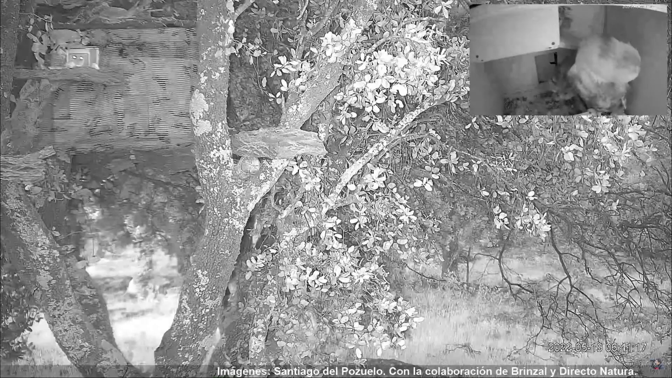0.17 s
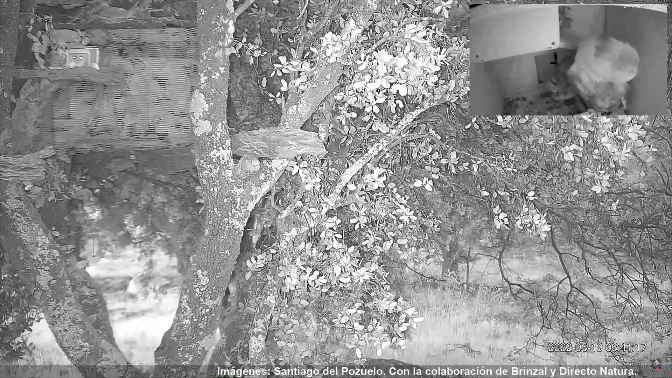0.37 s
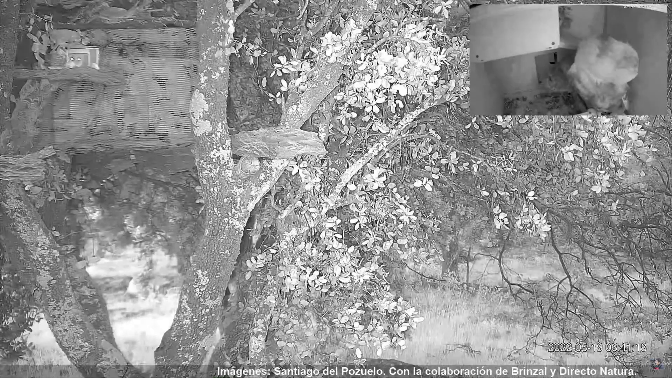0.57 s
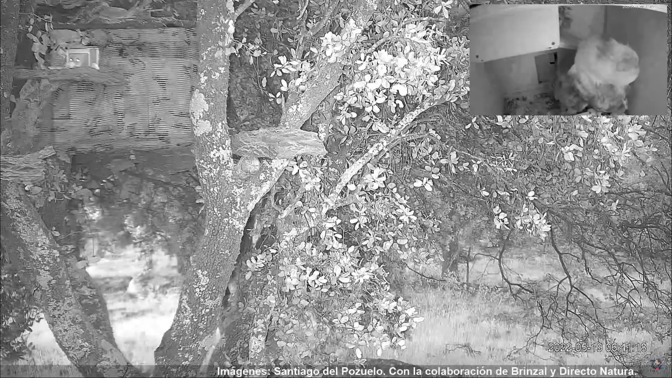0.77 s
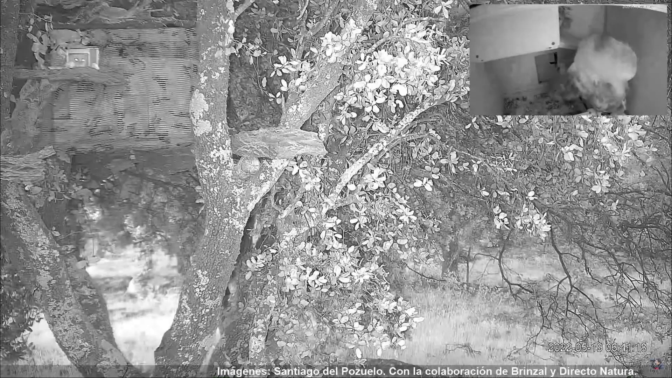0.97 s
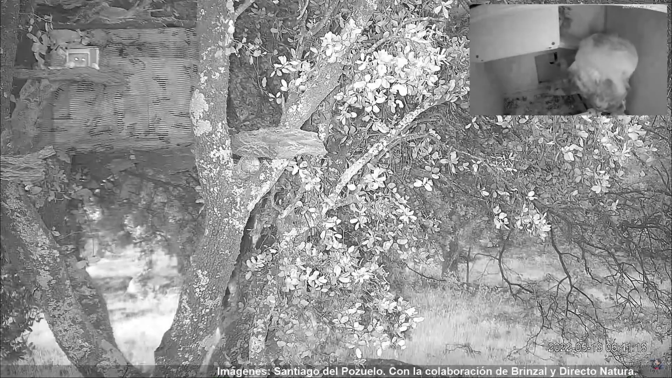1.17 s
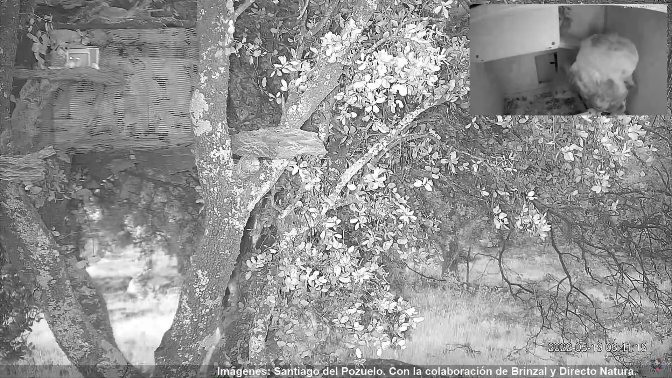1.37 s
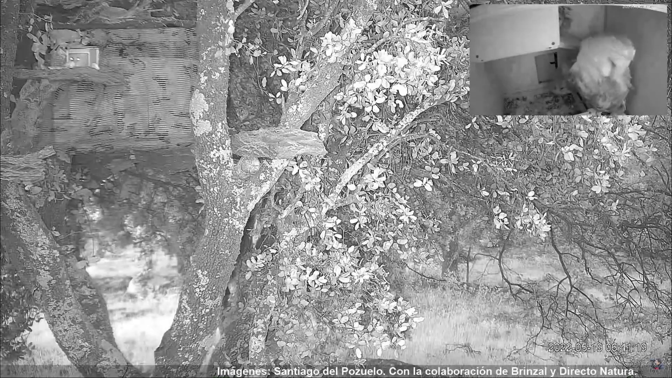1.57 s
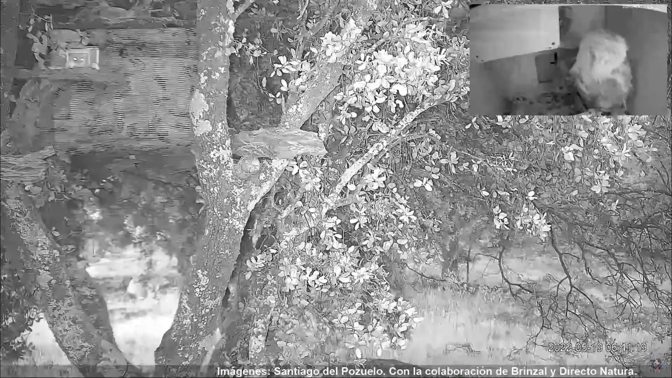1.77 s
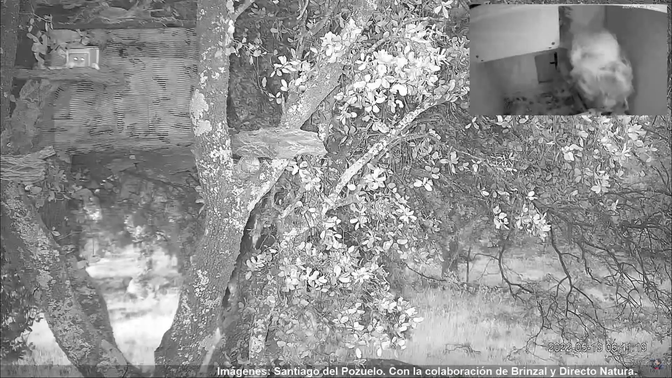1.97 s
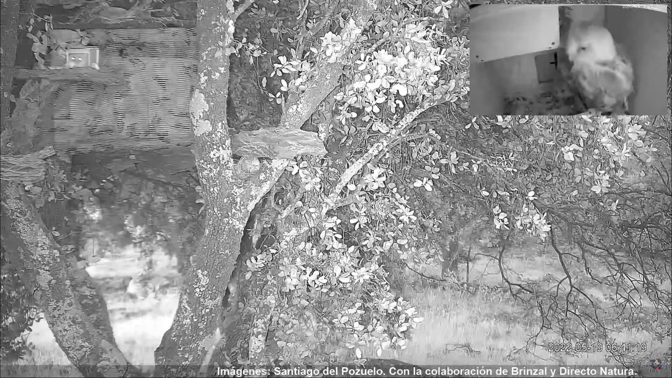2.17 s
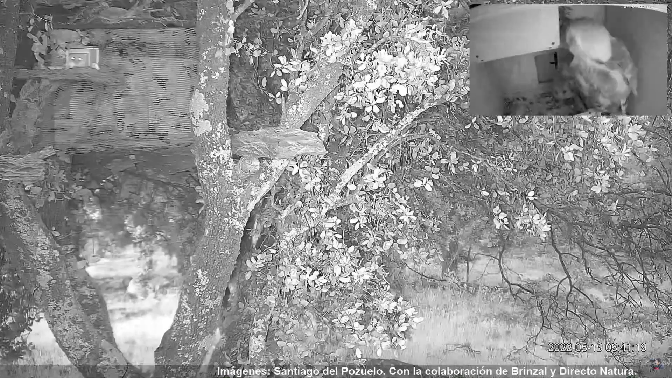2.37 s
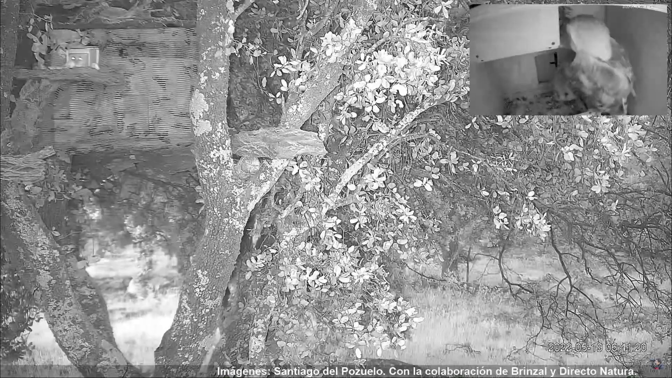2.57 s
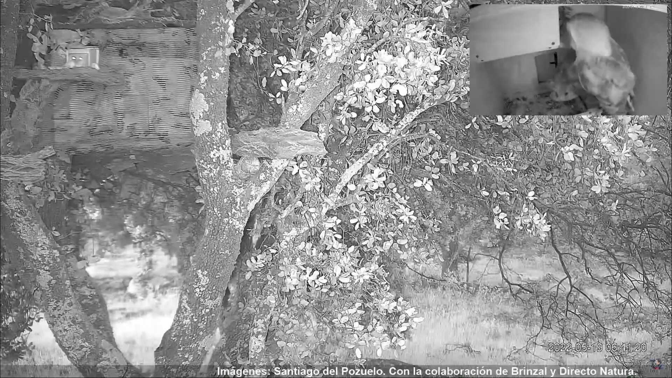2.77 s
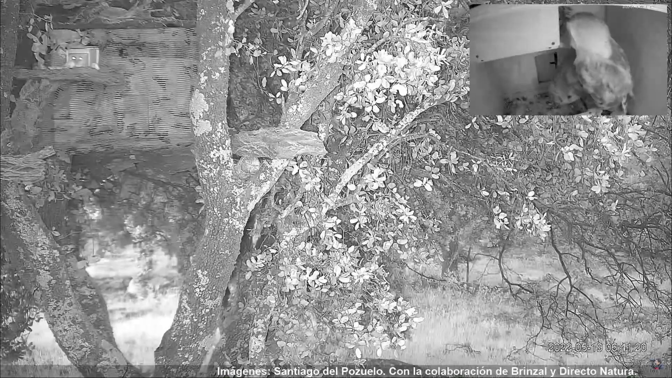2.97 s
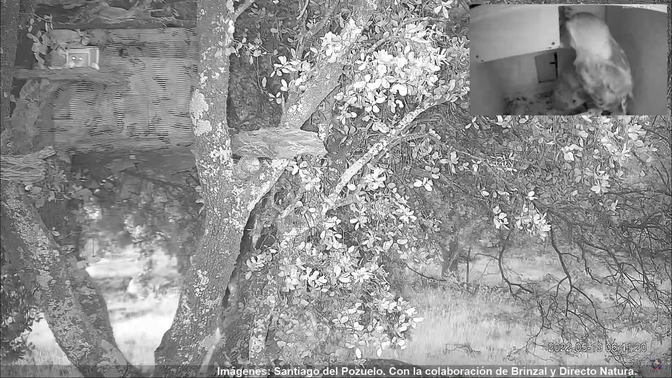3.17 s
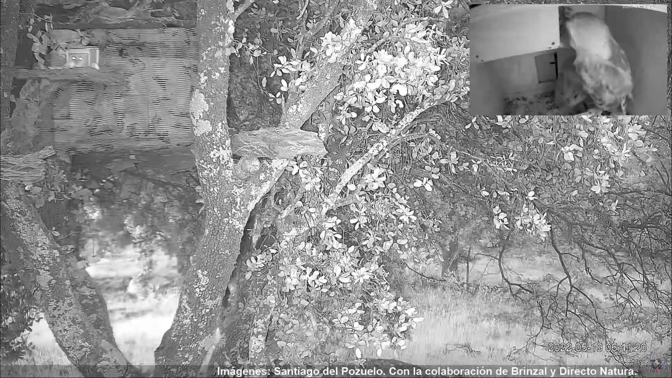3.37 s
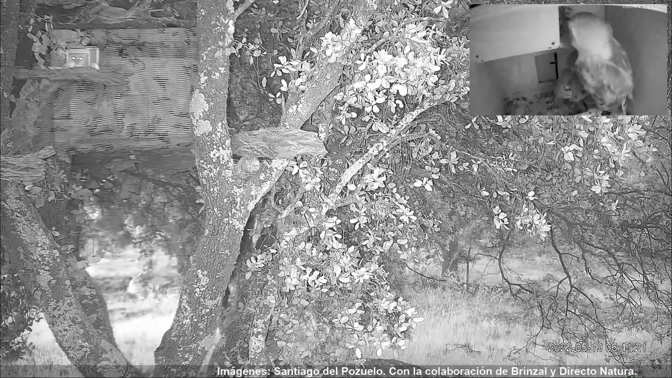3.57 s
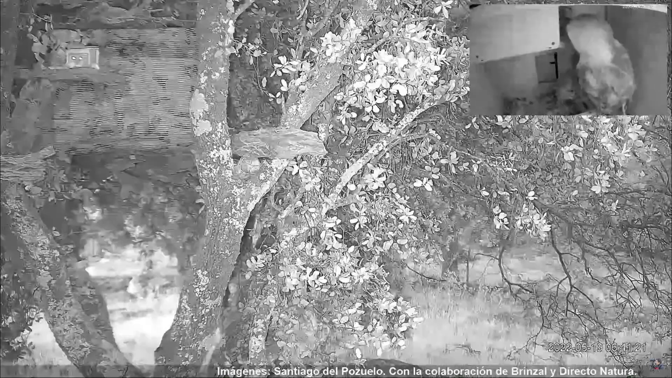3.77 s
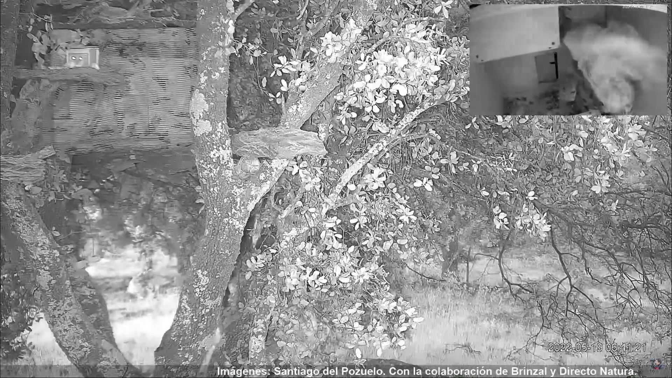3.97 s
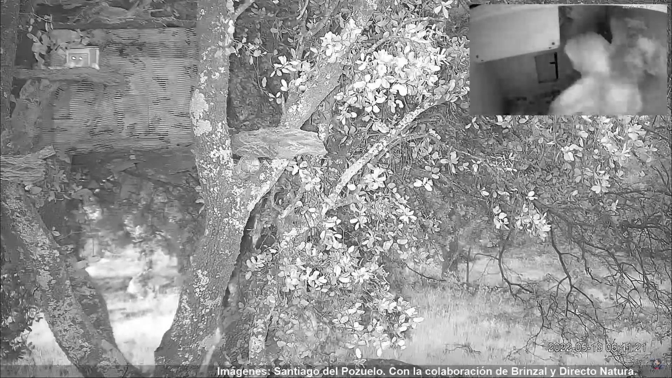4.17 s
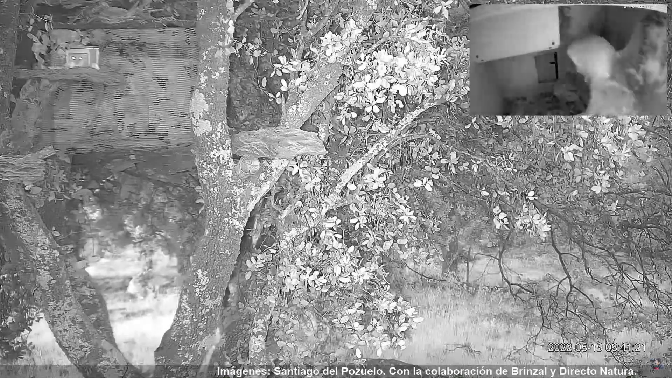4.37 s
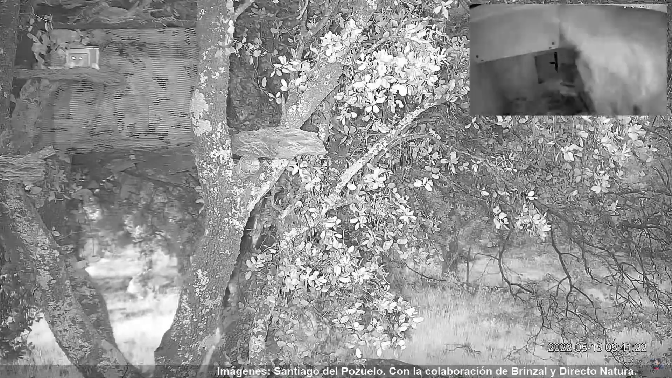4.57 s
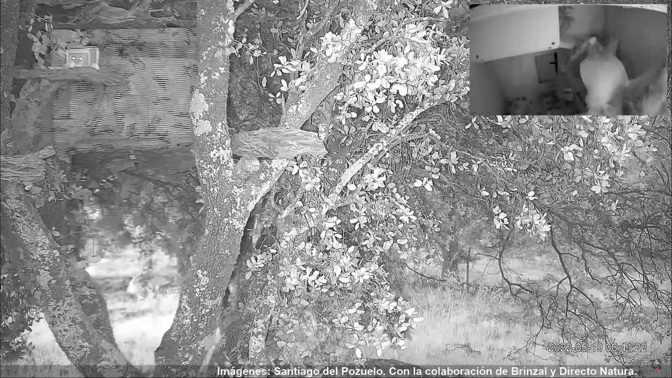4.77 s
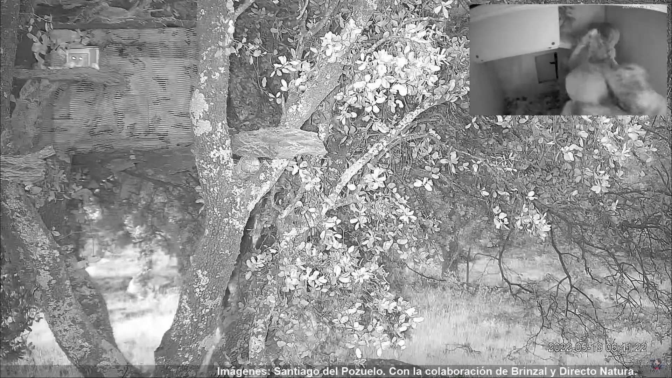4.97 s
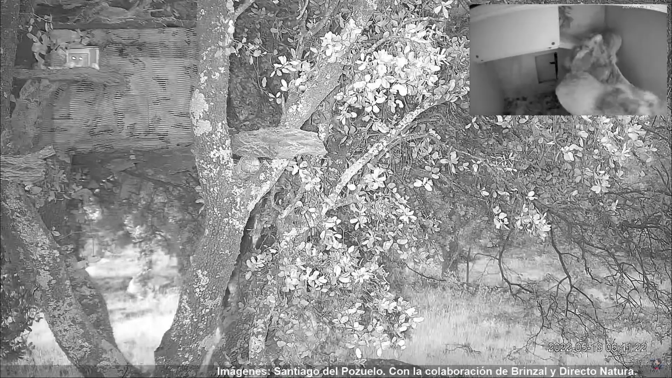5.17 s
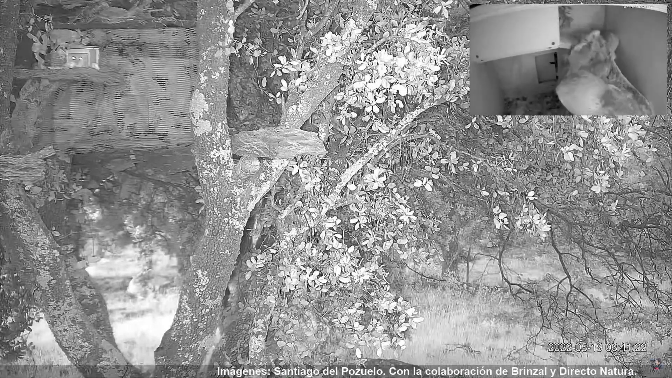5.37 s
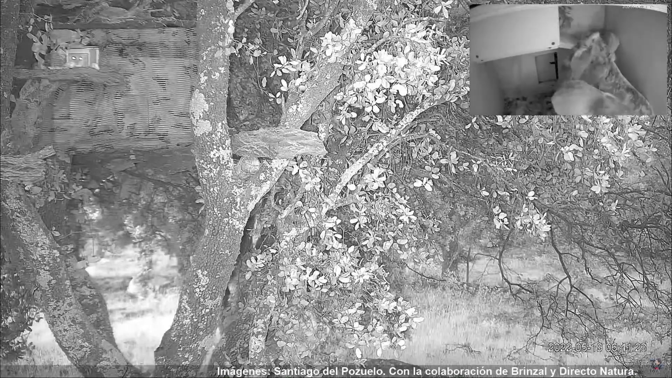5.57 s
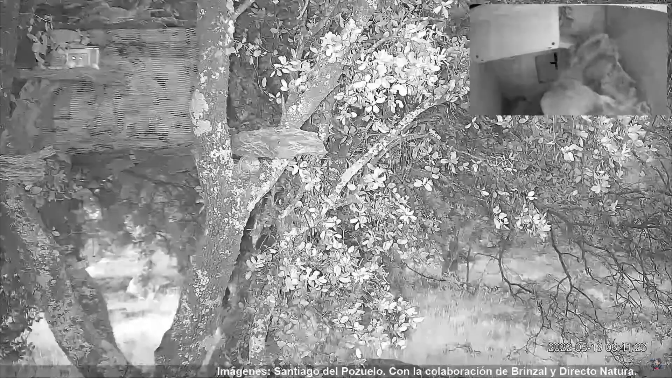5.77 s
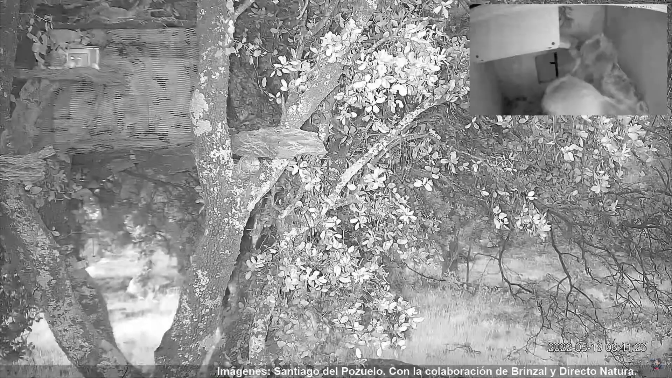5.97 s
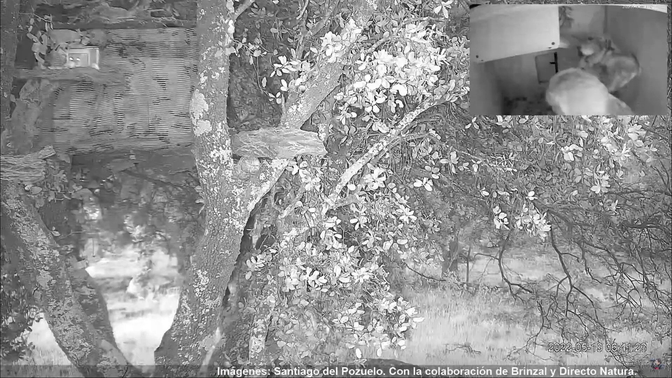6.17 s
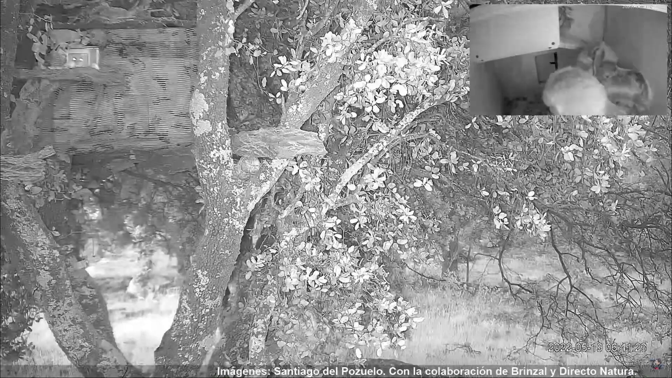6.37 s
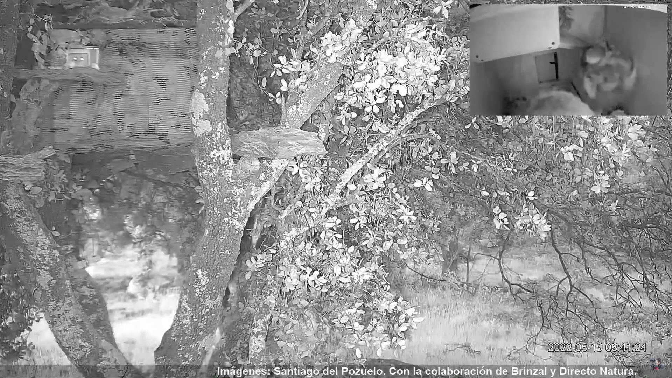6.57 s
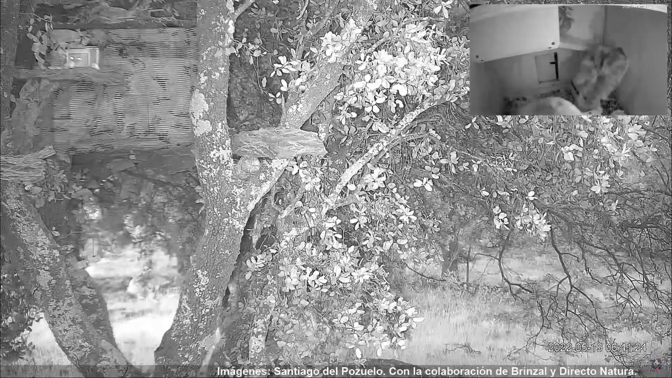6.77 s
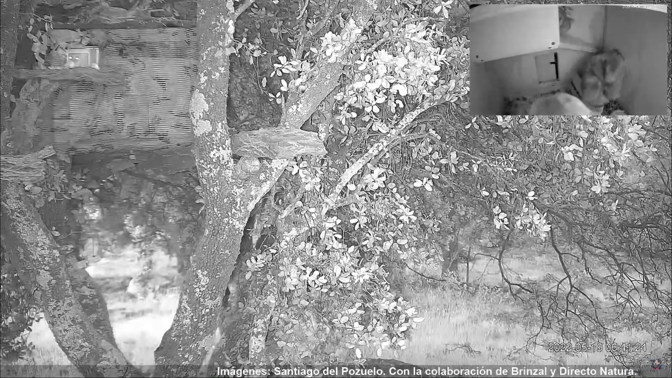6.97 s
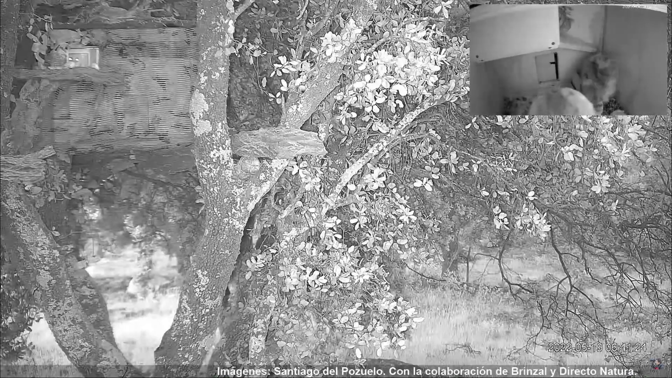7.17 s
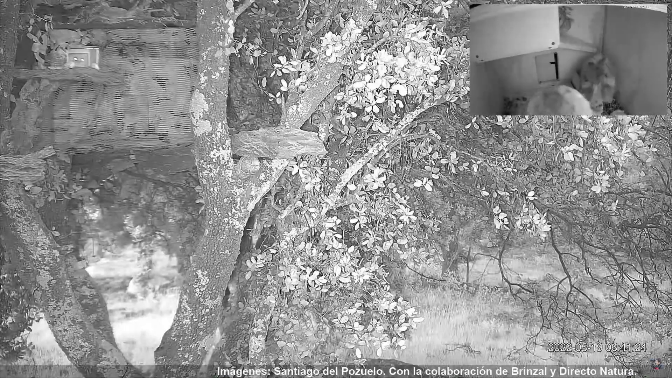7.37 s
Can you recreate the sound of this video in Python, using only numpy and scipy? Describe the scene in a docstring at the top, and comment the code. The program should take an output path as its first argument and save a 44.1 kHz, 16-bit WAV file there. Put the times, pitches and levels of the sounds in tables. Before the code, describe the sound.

A microphone in a small hollow wooden box catches a chick's clumsy footing: isolated muffled knocks and claw clicks, then a dense scraping scramble with deep wing-beat puffs, then more thumps including one very heavy. Outside among trees, a small bird sings two short high warbles early on, followed by sparse chirps. Low board murmur, soft air hiss and a very faint ticking electronic whine continue throughout.

```python
"""A songbird warbles outside a wooden nest box, breaks off and warbles again, while within an owl chick stumbles:
its feet and body strike the boards into resonance, its claws tick and its feathers scuff by dry friction.
Scattered chips follow; near four seconds comes a long scramble with two wing strokes that pump the air of the box.
More thumps, the loudest past six seconds, lead to the end. Beneath all lie murmuring boards, faint air noise and a
ticking camera whine; the level dips briefly just before sudden clicks, and loud thumps are held down."""
import sys
import numpy as np
from scipy import signal
from scipy.fft import rfft, irfft, next_fast_len
from scipy.io import wavfile
from scipy.ndimage import uniform_filter1d, minimum_filter1d, map_coordinates

SR = 44100
rng = np.random.default_rng(int(sys.argv[2]) if len(sys.argv) > 2 else 0)


def level_to_linear(level):
    """Convert decibel levels to linear amplitude factors, elementwise."""
    exponent = np.asarray(level, float) / 20
    return 10 ** exponent


def waveform_to_disk(signal):
    """Save audio, clipped to [-1, 1], as 16-bit WAV at the path in sys.argv[1]."""
    frames = np.transpose(np.atleast_2d(signal))
    scaled = np.clip(frames, -1, 1) * 32767
    samples = np.round(scaled).astype(np.int16)
    wavfile.write(sys.argv[1], SR, samples)


N = 327663

# Resonances of the wooden box. Each row: centre in Hz, bandwidth in Hz, level in dB.
BOX_MODES = [(59.7, 22.8, 6), (140, 52.2, 5.5), (185.6, 46.7, 1), (244.3, 25.2, -5.5), (298.5, 49.5, -17),
             (502, 54.7, -18), (676.6, 56, -24.5)]


def unit(x):
    """Normalisation by the root mean square, which becomes 1."""
    return x / np.sqrt(np.mean(x ** 2) + 1e-20)


def filtered(x, response):
    """Linear filtering: the spectrum of x times a complex response of frequency."""
    m = next_fast_len(N + SR // 2)
    return irfft(rfft(x, m) * response(np.fft.rfftfreq(m, 1 / SR)), m)[..., :N]


def peak(f, hz, width):
    """Response of one damped, causal resonator, gain 1 at its centre."""
    return 1j * f * width / (hz * hz - f * f + 1j * f * width)


def body(modes):
    """Modal superposition: a sum of resonances, neighbours in opposite phase."""
    return lambda f: sum((-1) ** k * level_to_linear(db) * peak(f, hz, w) for k, (hz, w, db) in enumerate(modes))


def colour(points):
    """Spectral envelope: gain through (Hz, dB) points on a logarithmic frequency axis."""
    hz, db = np.transpose(points)
    return lambda f: level_to_linear(np.interp(np.log(f + 1), np.log(hz + 1), db))


def wobble(rate):
    """Band-limited random modulation: a smooth curve through `rate` random knots a second."""
    return map_coordinates(rng.standard_normal(int(N * rate / SR) + 4), [np.arange(N) * rate / SR])


def patchy(x, patchy_db):
    """Time-varying filtering: patches of random gain over time and frequency."""
    z = signal.stft(x, nperseg=256)[2]
    field = uniform_filter1d(rng.standard_normal(z.shape), size=2, axis=0)
    field = uniform_filter1d(field, size=16, axis=1)
    return signal.istft(z * unit(level_to_linear(patchy_db * unit(field))), nperseg=256)[1][:N]


def add(track, s, sound):
    """Superposition: mixes a sound into the track at time s."""
    spot = track[round(s * SR):][:len(sound)]
    spot += sound[:len(spot)]


def columns(rows):
    """Linear interpolation: one value per sample for each column after the time."""
    s, *cols = np.transpose(rows)
    return [np.interp(np.arange(N) / SR, s, c) for c in cols]


def whistle(pitch):
    """Frequency modulation: a sine whose phase is the running integral of its pitch in Hz."""
    return np.sin(2 * np.pi * np.cumsum(pitch) / SR)


def background_air():
    """Stationary broadband noise of the outdoors and the microphone itself, coloured by a fixed spectrum."""
    # Spectrum of the noise. Each row: frequency in Hz, relative density in dB per Hz.
    spectrum = [(20, -9), (65, -2), (216, -12), (513, -27), (759, -38), (1610, -40), (2350, -42.5),
                (2850, -46), (3740, -46.5), (5680, -53.5), (16000, -54)]
    noise = unit(filtered(rng.standard_normal(N), colour(spectrum)))
    return level_to_linear(-50.5 + 0.29 * wobble(2.7)) * noise


def camera():
    """Amplitude-modulated narrowband noise: the electronics whine faintly and swell once per frame."""
    frame_rate_hz, whine_hz, width_hz = 25, 4370, 330
    phase = (np.arange(N) / SR * frame_rate_hz) % 1
    swell = 0.3 + np.exp(-.5 * ((phase - .43) / 0.09) ** 2)
    burst = swell * level_to_linear(2 * wobble(22)) * rng.standard_normal(N)
    whine = unit(filtered(burst, lambda f: peak(f, whine_hz, width_hz) ** 2))
    return level_to_linear(-79) * whine


def songbird():
    """Frequency modulation by two voices of one throat, with chips of other birds, all reverberated by trees."""
    # Warble swinging between two pitches. Each row: time in seconds, trough in Hz, crest in Hz, level in dB.
    warble = [(0, 4056, 5350, -63.5), (.09, 3850, 5000, -68), (.125, 3960, 4480, -91),
              (1.28, 3990, 6390, -100), (1.31, 4380, 6320, -68), (1.36, 4550, 6320, -77),
              (1.41, 4390, 6410, -63), (1.55, 4247, 6290, -67), (1.85, 4400, 6260, -58),
              (1.875, 4040, 5420, -58.5), (1.985, 3560, 4850, -61.5), (2.028, 3630, 4225, -63),
              (2.05, 3260, 3500, -92)]
    # The two phrases. Each row: time in seconds at which a trough falls, swing rate in Hz.
    phrases = [(.022, 17.9), (1.662, 20)]
    # Single chips, the first leading into the second phrase.
    # Each row: start in seconds, length in seconds, mid pitch in Hz, rise as a share of pitch, level in dB.
    chips = [(1.29, .038, 4130, .26, -74), (2.623, .035, 4510, -0.0051, -76),
             (2.842, 0.016, 4220, 0.13, -69), (2.95, 0.019, 3480, .12, -67), (3.29, .022, 3450, .1, -70),
             (3.769, 0.038, 5130, -0.03, -75), (7.201, 0.035, 4460, 0.0062, -69)]
    break_hz, break_width_hz, thin_db = 5550, 650, 27  # the voice thins where it crosses its break
    twitter_hz, twitter_swing_hz, twitter_db = 7250, 298, -21.5  # level relative to the warble
    rise_db, octave_db = -22, -20  # narrow swings all but drop out on the way up; the overtone

    t = np.arange(N) / SR
    trough_hz, crest_hz, db = columns(warble)
    (first_s, first_hz), (second_s, second_hz) = phrases
    turns = np.where(t < 1, first_hz * (t - first_s), second_hz * (t - second_s))
    turn = 2 * np.pi * turns + 0.3 * wobble(20)
    wide = crest_hz > break_hz  # only wide swings cross the break
    joined = (t > 1.55) & (t < 2)  # the twitter joins late in the second phrase

    # wide swings dwell in the troughs, narrow ones on the crests
    swing = ((1 - np.cos(turn)) / 2) ** np.where(wide, 1.5, .75)
    pitch = trough_hz + (crest_hz - trough_hz) * swing + 130 * wobble(90)
    voice_db = -thin_db * wide * np.exp(-((pitch - break_hz) / break_width_hz) ** 2)
    voice_db = voice_db + rise_db * (joined & ~wide) * np.maximum(np.sin(turn + .6), 0) ** 2
    tones = whistle(pitch) + joined * level_to_linear(octave_db) * whistle(2 * pitch)
    song = level_to_linear(db + voice_db + 3.6 * wobble(60)) * tones

    # the other side of the throat follows the swing, and twitters faintly above it
    shadow_on = (t < 1) | (joined & wide)
    shadow = level_to_linear(db - 13 - 5.4 * (t > 1)) * shadow_on * whistle(np.minimum(pitch + 1500, twitter_hz))
    twitter = whistle(twitter_hz + twitter_swing_hz * wobble(200))
    twitter = level_to_linear(twitter_db + db + 8 * wobble(110)) * twitter

    far = [(3.1 + .062 * k, .022, 3300, .1, -77) for k in range(4)]  # a far bird repeats one note
    for s, length, hz, rise, chip_db in list(chips) + far:
        u = np.linspace(-1, 1, round(length * SR))
        add(song, s, level_to_linear(chip_db) * np.sqrt(1 - u ** 4) * whistle(hz * (1 + rise * u / 2)))

    song = filtered(song, lambda f: np.abs(peak(f, 4400, 800)) + .4)
    song = (song + joined * twitter + shadow) * level_to_linear(3.6 * wobble(500))  # fast flutter makes it husky
    echoes = level_to_linear(-60 * t[:SR // 4] / 0.11) * rng.standard_normal(SR // 4)
    return song + level_to_linear(-7.5) * signal.fftconvolve(song, echoes / np.linalg.norm(echoes))[:N]


def stirring():
    """Random excitation of low modes: shifting weight keeps the boards murmuring in uneven lumps."""
    # The chick's weight shifting on the floor. Each row: time in seconds, level in dB.
    stir = [(0, -44), (2.299, -48.5), (2.95, -46.5), (3.13, -35.5), (3.4, -53), (3.75, -39), (4.1, -35.5),
            (4.6, -20), (4.88, -42), (5.55, -35), (6, -42.5), (6.35, -34.5), (7.1, -46.5)]
    lumps = level_to_linear(3.5 * wobble(16) + 1.5 * wobble(5))
    soft = lambda f: body(BOX_MODES)(f) / (1 + 1j * f / 350) ** 2  # soft weight wakes only the low modes
    creep = filtered(lumps * rng.standard_normal(N), soft)
    return level_to_linear(columns(stir)[0]) * unit(creep)


def wings():
    """Pressure in a leaky cavity: a stroke sucks air out, presses it back, and the entrance lets it leak away."""
    # Wing strokes. Each row: start in seconds, level in dB.
    strokes = [(4.603, -6.5), (4.737, -20)]
    pressure, t = np.zeros(N), np.arange(SR // 8) / SR
    envelope = np.exp(-t / 0.022) * (1 - np.exp(-t / 0.00075))
    pulse = -envelope * np.sin(2 * np.pi * 4.3 * np.sqrt(t))  # the swing slows as it dies
    for s, db in strokes:
        add(pressure, s, level_to_linear(db) * pulse)
    return pressure


def port(f):
    """Resonance of the microphone's sound port: a peak, then a steep loss of treble."""
    return 4400 ** 2 / (4400 ** 2 - f * f + 1j * f * 1100) / (1 + (f / 4900) ** 12)


def claws():
    """Impact and stick-slip friction: harder contact wakes upper modes and snaps in air, softer goes into wood."""
    # Claw ticks. Each row: start in seconds, level in dB, wood knock in relative dB, hardness in dB.
    ticks = [(0.608, -41, 32, -41.5), (0.646, -35.5, 0.5, -17.5), (0.6732, -35, 6, -17),
             (0.6898, -32, 0, -19.5), (1.3483, -38.5, 9.5, -23), (1.3684, -16, -3.5, -22.5),
             (1.8417, -19.5, -11.5, -18.5), (2.426, -29.5, -25, -17), (2.4603, -38, 14, -27),
             (2.548, -51, -11.5, -7.5), (3.73, -37.5, -3, -16.5), (3.876, -32, 2, -11),
             (3.9409, -32.5, -28, 3), (4.003, -34, -22, -32), (4.0697, -27, -13.5, -11),
             (4.152, -37.5, -16, -4.5), (4.2543, -24.5, 0, 0), (4.272, -33.5, -3, -6),
             (4.4807, -28, -3, -20), (4.546, -21.5, -19, -2), (4.5734, -35.5, -24.5, -1.5),
             (4.656, -33.5, -6, -11.5), (4.9707, -30, -2, -13.5), (4.99, -38.5, -5, -5.5),
             (5.0166, -19.5, -4.5, -12.5), (5.329, -25, -2.5, -18), (5.4165, -35.5, -5.5, -12),
             (6.1052, -26.5, 2, -15), (6.152, -35, 5.5, -11.5), (6.404, -39, -15, -15.5),
             (6.6399, -33, 1.5, -14), (6.697, -41, 9.5, -4), (6.7363, -34, 12.5, -2),
             (6.7783, -14.5, 3, -10), (6.8067, -27, 8.5, -5.5)]
    # Feathers and feet dragged over the boards.
    # Each row: start in seconds, length in seconds, level in dB, hardness in dB.
    scuffs = [(0.168, 0.16, -64.5, -27), (0.53, 0.053, -57, -27), (1.374, 0.088, -53.5, -20),
              (1.886, 0.12, -60, -15), (2.042, 0.13, -71, -30), (2.405, 0.031, -49, -24),
              (3.027, 0.17, -52, -20.5), (4.945, 0.16, -55.5, -24.5), (6.274, 0.074, -44.5, -14.5),
              (6.683, 0.17, -40.5, -15.5), (7.088, 0.34, -67, -23.5)]
    # The long scramble, a run of short scrapes with near-silent gaps.
    # Each row: time in seconds, level in dB, hardness in dB.
    scramble = [(3.84, -75, -14), (3.9, -45.5, -25.5), (3.99, -62.5, 3), (4.035, -46.5, -11.5),
                (4.055, -68, -19), (4.125, -43.5, -15.5), (4.175, -51.5, -15.5), (4.225, -47, -3.5),
                (4.25, -59, -12), (4.29, -45, -24), (4.33, -67, -6.5), (4.4, -37, -14), (4.465, -61, -16.5),
                (4.497, -37, -20), (4.512, -56, -18.5), (4.523, -49, -8), (4.585, -57, -14),
                (4.597, -40.5, 1.5), (4.648, -67, -12), (4.675, -49, 1.5), (4.735, -35.5, -13),
                (4.77, -59.5, 4), (4.8, -69, -14.5)]
    # Modes of the scraped boards. Each row: centre in Hz, bandwidth in Hz, level in dB.
    board_modes = [(954, 255, 5), (1340, 270, 6), (1576, 144, 10), (1918, 147, 6), (2527, 600, 4.5),
                   (3025, 226, 7), (3573, 387, -2)]
    # Spectrum of the snap in the air. Each row: frequency in Hz, gain in dB.
    snap_colour = [(3000, -6), (7500, -1), (14000, -20.5)]

    wood, low, high, snap = layers = np.zeros((4, N))
    t = np.arange(SR // 8) / SR

    # each claw gives a tick and a short gritty slide
    fades = level_to_linear(np.outer([1.5, -4.5, -4.5, -62.0], t / 0.078))  # the snap in the air is over sooner
    for s, db, wood_db, hard_db in ticks:
        decay = 3 * level_to_linear(-60 * t / 0.0001) + 0.44 * level_to_linear(-60 * t / 0.048) * rng.standard_normal((4, len(t)))
        levels_db = (wood_db, 0, hard_db, 1.7 * hard_db - 9.0)
        for layer, grain, level_db in zip(layers, decay * fades, levels_db):
            add(layer, s, level_to_linear(db + level_db) * grain)

    # friction is made of clumps of tiny catches, partly shared by all layers
    clumps_db = np.array([2.2 * wobble(45) + 4.2 * wobble(500) for layer in layers])
    catches = unit(level_to_linear(2.4 * wobble(90) + clumps_db) * rng.standard_normal((4, N)))
    shares = lambda hard_db: np.array([-.7 * hard_db - 12.5, 0 * hard_db, hard_db, hard_db - 15.5])
    scrape_db, scrape_hard_db = columns(scramble)
    layers += level_to_linear(scrape_db + shares(scrape_hard_db)) * catches
    for s, length, db, hard_db in scuffs:
        count = round(length * SR)
        smooth = np.sin(np.linspace(0, np.pi, count)) ** 0.65
        stroke = smooth * catches[:, round(s * SR):][:, :count]
        for layer, grain, level_db in zip(layers, stroke, shares(hard_db)):
            add(layer, s, level_to_linear(db + level_db) * grain)
    # down and litter never lie still
    layers[:3] += level_to_linear([db + 2.1 * wobble(17) for db in (-66, -72, -82)]) * catches[:3]

    knock = filtered(wood, lambda f: body(BOX_MODES[-3:])(f) / (1 + 1j * f / 1500) ** 2)
    board = filtered(low, lambda f: body(board_modes[:4])(f) / (1 + 1j * f / 2500) ** 2)
    board = board + filtered(high, body(board_modes[4:]))
    board = patchy(filtered(board, port), patchy_db=2.5)
    return level_to_linear(38.5) * knock + board + filtered(snap, colour(snap_colour))


def thumps():
    """Impulsive modal excitation: a soft blow swings the panel, booms the box and roughly shakes its modes."""
    # Blows of feet and body. Each row: start in seconds, level in dB, pitch of the struck panel in Hz.
    blows = [(0.11, -12.5, 159.7), (0.614, -4, 157), (0.657, -20, 140), (1.345, -22.5, 140),
             (1.371, -17.5, 152), (1.73, -20, 121.5), (1.866, -18.5, 148), (2.468, -7.5, 159.7),
             (3.939, -11.5, 175.3), (4.101, -16, 140), (4.256, -11, 190.7), (4.429, -9, 130.7),
             (4.506, -8.5, 135), (4.545, -3.5, 134.5), (4.586, -16, 133.7), (4.725, -17, 221.5),
             (4.744, -9.5, 116.4), (5.007, -17.5, 76.2), (5.221, -16.5, 164), (5.363, -17, 169.6),
             (5.414, -15.5, 152), (5.425, -9.5, 143), (6.106, -10.5, 94), (6.15, 0.5, 132.2),
             (6.399, -10, 140), (6.604, -10, 116), (6.729, -12.5, 140), (6.752, -7, 153), (6.78, -4.5, 140),
             (7.387, -18.5, 140)]
    panel, shake, t = np.zeros(N), np.zeros(N), np.arange(SR // 2) / SR
    rise = (1 - np.exp(-t / 0.0017)) ** 2  # soft contact
    for s, db, hz in blows:
        t60 = rng.uniform(0.098, 0.13)  # seconds for the panel to fall by 60 dB
        swing = level_to_linear(-60 * t / t60) * np.sin(2 * np.pi * hz * t)
        spread_db, boom_hz = rng.normal(0, 2), rng.uniform(62, 80)
        boom = level_to_linear(spread_db - 12.5 - 60 * t / 0.35) * np.sin(2 * np.pi * boom_hz * t)
        add(panel, s, level_to_linear(db) * rise * (swing + boom))
        add(shake, s, rise * level_to_linear(db - 60 * t / (1.3 * t60)) * rng.standard_normal(len(t)))
    dull = lambda f: body(BOX_MODES)(f) / (1 + 1j * f / 700) ** 2
    return panel + level_to_linear(9.0) * filtered(shake, dull)


def scene():
    """Superposition of all sources in one signal, sent alike to both channels."""
    mono = background_air() + camera() + songbird() + stirring() + wings() + claws() + thumps()
    return np.array([mono, mono])


def band_limit(x):
    """A steep low-pass at the top of the band."""
    return signal.sosfilt(signal.butter(12, 16620, fs=SR, output="sos"), x)


def record(dry):
    """Level modulation and compression: brief dips just before clicks, loud thumps held down, a ceiling, a spread."""
    # One microphone equalised apart for two channels.
    # Each row: centre in Hz, bandwidth in Hz, share added to the left and taken from the right.
    spread = [(483, 160, -0.23), (1230, 480, -0.29), (3500, 4000, 0.15)]
    x = dry[0]

    # the level dips ahead of an edge far above those just past, if a loud blow follows
    edge = uniform_filter1d(np.abs(filtered(x, lambda f: peak(f, 1400, 1600) ** 2)), size=60)
    lately = -minimum_filter1d(-edge, size=401, origin=200)
    coming = -minimum_filter1d(-edge, size=401, origin=-200)
    loud = -minimum_filter1d(-np.abs(x), size=901, origin=-450)
    dip = uniform_filter1d(np.minimum(7 * lately / coming, 1) ** (4 * loud), size=40)

    over = np.maximum(np.abs(x) / 0.59, 1) ** -.5  # compression by two to one above the threshold
    gain = uniform_filter1d(minimum_filter1d(over, size=900), size=200)
    x = 1.185 * x * gain * dip
    x = x / (1 + np.abs(x / .6) ** 6) ** (1 / 6)  # smooth ceiling at 0.6

    side = filtered(x, lambda f: sum(share * peak(f, hz, w) for hz, w, share in spread))
    return band_limit(np.array([x + side, x - side]))


dry = scene()
out = record(dry)
waveform_to_disk(out)
```